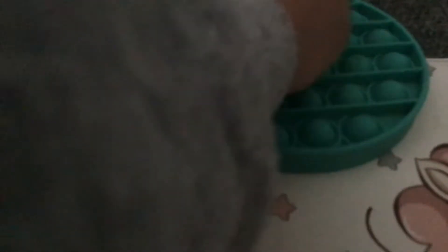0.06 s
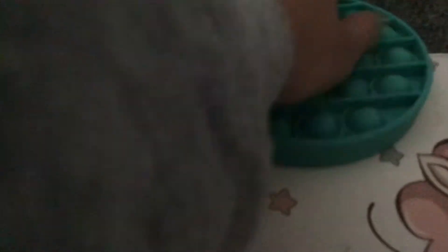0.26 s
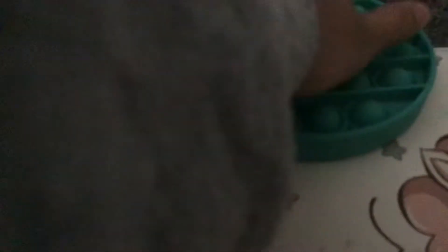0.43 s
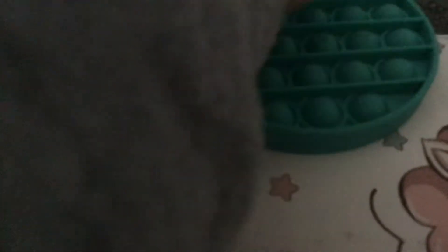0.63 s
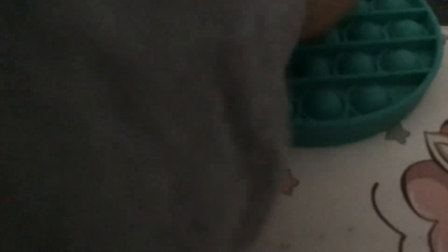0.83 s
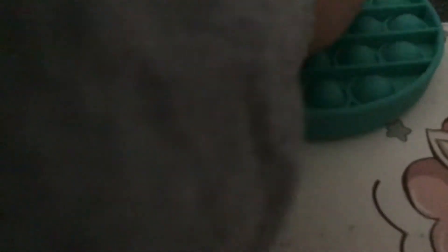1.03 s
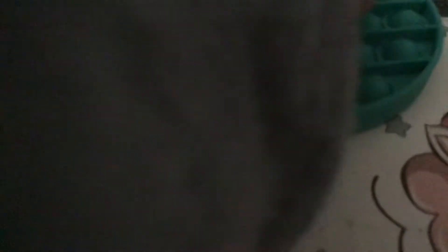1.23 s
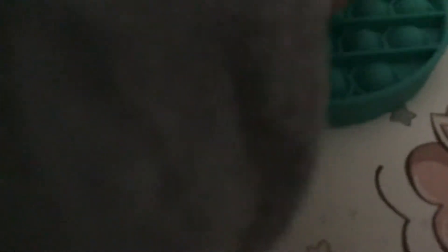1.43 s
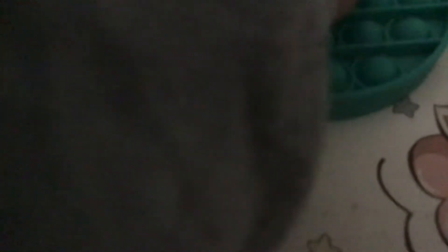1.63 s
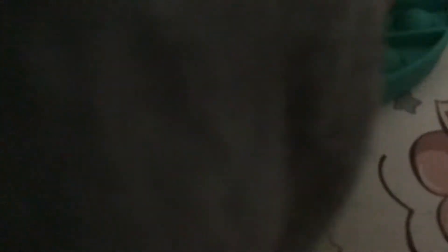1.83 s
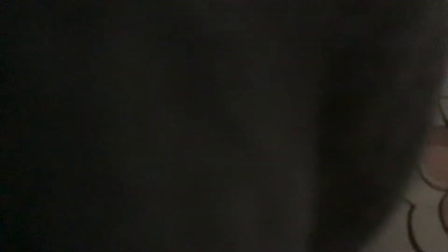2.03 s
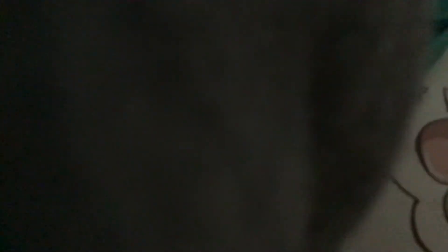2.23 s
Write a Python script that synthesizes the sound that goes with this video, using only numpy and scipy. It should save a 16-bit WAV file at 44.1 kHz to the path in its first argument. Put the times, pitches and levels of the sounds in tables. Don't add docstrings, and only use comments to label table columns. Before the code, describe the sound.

A finger presses silicone bubbles of a fidget toy, making uneven soft hollow pops and dull knocks

```python
import sys
import numpy as np
from scipy import signal
from scipy.io import wavfile

SR = 44100
rng = np.random.default_rng(int(sys.argv[2]) if len(sys.argv) > 2 else 0)


def invert_db(level):
    return 10 ** (np.asarray(level, dtype=float) / 20)


def put_to_file(sound):
    columns = np.atleast_2d(sound).T
    safe = np.clip(columns, -1, 1)
    whole_steps = np.round(safe * 32767)
    wavfile.write(sys.argv[1], SR, whole_steps.astype(np.int16))


N = 100107


def rms_one(x):
    return x / np.sqrt(np.mean(x ** 2) + 1e-20)


def bell(x, rise, fall):
    return np.exp(-(x / np.where(x < 0, rise, fall)) ** 2)


def drift(rate_hz):
    r = np.exp(-2 * np.pi * rate_hz * 40 / SR)
    settled = 2000
    slow = signal.lfilter([1], [1, -2 * r, r * r], rng.standard_normal(N // 40 + 2 + settled))[settled:]
    return np.interp(np.arange(N) / 40, np.arange(len(slow)), rms_one(slow))


def banded_noise(spectrum, patchy_db):
    out = 0
    together = drift(9)
    edges = 28 * 2 ** np.arange(0, 9.6, .5)
    white = rng.standard_normal((2, N))
    hz, db = np.transpose(spectrum)
    for k, (low, high) in enumerate(zip(edges, edges[1:])):
        band_pass = signal.butter(2, [low, high], "band", fs=SR, output="sos")
        band = signal.sosfilt(band_pass, white[k % 2])
        level_db = np.interp(np.log(low * high) / 2, np.log(hz), db)
        flicker_db = patchy_db * (.8 * together + .8 * drift(26))
        out = out + invert_db(level_db + flicker_db) * band
    return rms_one(out)


def packets(rows, sink, rise, fall, lag_s):
    wave = np.zeros(N)
    for crest_s, db, hz, cycles in rows:
        turns = (np.arange(N) / SR - crest_s - lag_s) * hz
        sinking_turns = (1 - np.exp(-sink * np.clip(turns, -8, 8))) / sink
        wave += invert_db(db) * bell(turns / cycles, rise, fall) * np.cos(2 * np.pi * sinking_turns)
    return wave


def ring(clicks, hz, t60_s):
    r = invert_db(-60 / (t60_s * SR))
    w = 2 * np.pi * hz / SR
    softener = signal.butter(1, [hz * .7, hz * 1.4], "band", fs=SR, output="sos")
    soft = signal.sosfilt(softener, clicks + 1e-18)
    return signal.lfilter([0, np.sin(w)], [1, -2 * r * np.cos(w), r * r], soft)


def quiet_room():
    # (frequency [Hz], density [dB per Hz])
    room_tone = [(18, -44), (30, -19.5), (114, -5.5), (324, -19.5), (505, -28.5), (1230, -35), (1910, -33),
                 (5170, -40.5), (15500, -52)]
    return invert_db(-65.5) * banded_noise(room_tone, patchy_db=1.2)


def sleeve_level():
    # (time [s], level [dB])
    brushing = [(0, -68), (.14, -74), (.31, -64), (.37, -53.5), (.55, -56), (.66, -54), (.8, -61),
                (.95, -68), (1.15, -72), (1.24, -61), (1.33, -62), (1.45, -68), (1.75, -70), (1.95, -66),
                (2.05, -61), (2.13, -69), (2.27, -71)]
    return np.interp(np.arange(N) / SR, *np.transpose(brushing))


def sleeve(sleeve_db):
    # (frequency [Hz], density [dB per Hz])
    wool = [(90, -30), (160, -2), (313, -3.5), (590, -10), (800, -18), (1200, -17), (1700, -28),
            (9000, -58)]
    return invert_db(sleeve_db) * banded_noise(wool, patchy_db=2.5)


def restless_mat(sleeve_db):
    mat_hz, width_hz = 97, 50
    shoves = rng.standard_normal(N) * invert_db(2.6 * drift(3.6))
    resonance = signal.lfilter(*signal.iirpeak(mat_hz, mat_hz / width_hz, fs=SR), shoves)
    low_band = signal.butter(2, [45, 200], "band", fs=SR, output="sos")
    rumble = rms_one(signal.sosfilt(low_band, resonance))
    follow_db = .3 * (sleeve_db - sleeve_db.mean())
    return invert_db(-59 + follow_db) * rumble


def skin():
    # (time of the crest [s], level [dB], rise [s], fall [s])
    slides = [(.045, -69, .04, .05), (.235, -57.5, .04, .06), (.38, -72, .03, .03), (.6, -66, .03, .05),
              (.745, -66, .02, .06), (.88, -59.5, .045, .04), (1.04, -76, .02, .02),
              (1.27, -58, .015, .015), (1.3, -58.5, .05, .04), (1.59, -74, .03, .03), (1.71, -74, .03, .03),
              (1.955, -72, .02, .03), (2.045, -68, .02, .015), (2.09, -67, .03, .04)]
    # (frequency [Hz], density [dB per Hz])
    friction = [(290, -27), (500, 1), (638, 3), (839, -8), (1240, -6), (1800, -11), (4840, -20.5),
                (15500, -35)]
    pressure = np.zeros(N)
    for crest_s, db, rise_s, fall_s in slides:
        pressure += invert_db(db) * bell(np.arange(N) / SR - crest_s, rise_s, fall_s)
    return pressure * banded_noise(friction, patchy_db=1.5)


def wobbles():
    # (time of the crest [s], peak level [dB], frequency [Hz], length [cycles])
    pushes = [(.085, -45.5, 128, 0.76), (.211, -41.5, 151, 0.91), (.2345, -22, 99, 0.96),
              (.2585, -28.5, 111, 2.26), (.33, -47, 68.5, 1.65), (.602, -33.5, 100, .4),
              (.6112, -32, 100, .7), (.651, -41, 80, 1.1), (.679, -41.5, 111, 1.35), (.7745, -29, 105, 1.4),
              (.864, -30, 114, 1.1), (.883, -27.5, 73, 1.57), (.95, -48.5, 71, 1.3),
              (1.03, -45.5, 114, 1.3), (1.056, -47, 102, 1.14), (1.2982, -27, 85, .7),
              (1.3105, -39, 100, .4), (1.318, -27, 98, .9), (1.362, -33.5, 111, 1.56),
              (1.393, -32, 117, 0.52), (1.416, -30.5, 82.7, 0.66), (1.548, -44, 132, 0.62),
              (1.5755, -33.5, 108, 0.69), (1.633, -41.5, 101, 0.57), (1.658, -44.5, 108, 2),
              (1.7105, -32, 76.3, 0.82), (1.9695, -35.5, 97, 1.26), (2.064, -35, 90, .5),
              (2.0765, -29, 100, .5), (2.088, -27.5, 97, .8), (2.145, -38.5, 100, 1.2),
              (2.2295, -35, 101, 0.8), (1.04, -50, 55, 1.2), (1.39, -42, 58, .9), (1.505, -54, 60, 1.2),
              (1.775, -54, 110, 1.5), (1.69, -42, 125, .8), (2.2, -48, 45, 1.3)]
    return packets(pushes, sink=.07, rise=.95, fall=1.15, lag_s=.0013)


def snaps():
    # (time [s], peak level [dB], hollow modes [dB], wall modes [dB], rim modes [dB])
    dome_snaps = [(.2029, -61, 2, -6, -8), (.2262, -42, 4, -2, -12), (.2351, -45, 0, -16, -18),
                  (.3554, -60, 9, -6, -6), (.5764, -52, 8, -14, -14), (.6008, -37, -14, -3, 1),
                  (.7362, -30, -12, -1, -17), (.7472, -54, -6, -2, -6), (.9894, -66, -8, 4, 1),
                  (1.043, -68, -10, 8, 2), (1.2708, -42, 0, 3, 1), (1.2762, -54, 0, 4, 4),
                  (1.2793, -38, -10, 0, -1), (1.2842, -52, 2, -4, -6), (1.3072, -54, 6, -8, -8),
                  (1.3432, -43, -12, 3, 1), (1.5841, -53, 10, -10, -12), (1.6924, -52, 9, -12, -12),
                  (1.7185, -63, -6, 5, 0), (1.953, -62, -1, -2, -5), (2.0495, -58, 2, -8, -10),
                  (2.0535, -62, -4, 0, -4), (2.064, -36.5, -14, -12, -6), (2.1994, -64, 9, -8, -8),
                  (2.2637, -43, 5, -4, -4)]
    # (frequency [Hz], level [dB], decay time t60 [s], polarity [+1 or -1])
    dome_modes = [(620, -1, .012, 1), (950, 2, .008, -1), (1290, 1, .011, 1), (1560, -1, .008, -1),
                  (2070, -8, .008, -1), (2480, -16, .006, 1), (3300, -9, .007, 1), (3420, -30, .06, 1),
                  (4200, -5, .006, -1), (4850, -13, .006, 1), (5620, -23, .007, 1), (6200, -13, .008, -1),
                  (7250, -20, .006, 1)]
    buckle_db = [-12, 2.5, -9]
    buckle_gap_s = .0005
    hollow_to_hz, wall_from_hz, rim_from_hz, top_from_hz = 1100, 2300, 3800, 5900
    s, db, hollow_db, wall_db, rim_db = np.transpose(dome_snaps)
    chance = rng.standard_normal((len(s), 3, len(dome_modes) + 1))
    buckle_s = buckle_gap_s * (np.arange(3) - .2) * (1 + .15 * chance[..., -1])
    at = ((s[:, None] + buckle_s) * SR).astype(int)
    out = np.zeros(N)
    for k, (hz, level_db, t60_s, polarity) in enumerate(dome_modes):
        own_db = db + level_db - 2.5
        if hz < hollow_to_hz:
            own_db = own_db + hollow_db
        if hz > rim_from_hz:
            own_db = own_db + rim_db
        elif hz > wall_from_hz:
            own_db = own_db + wall_db
        if hz > top_from_hz:
            own_db = own_db + 3.2 * (db + 34)
        clicks = np.zeros(N)
        clicks[at] = polarity * invert_db(own_db[:, None] + np.array(buckle_db) + 1.1 * chance[..., k])
        out += ring(clicks, hz, t60_s)
    return out


def reflections(tick):
    t = np.arange(SR // 5) / SR
    tail = rng.standard_normal(len(t)) * invert_db(-60 * t / .07)
    tail = tail * (t > .003)
    return invert_db(-40) * signal.fftconvolve(tick, tail)[:N]


def knocks():
    # (time of the crest [s], peak level [dB], frequency [Hz], length [cycles])
    knocks_and_thuds = [(.225, -33, 230, 0.7), (.2455, -47, 330, .8), (.7378, -33, 330, .6),
                        (.5773, -40, 600, 1.4), (.5825, -32, 150, .7), (.5915, -31, 105, .7),
                        (.7408, -26, 322, .95), (.751, -26.5, 203, 1.0), (.857, -38, 227, 0.87),
                        (1.2732, -27.5, 300, .8), (1.2729, -33.5, 540, .9), (1.3085, -43, 420, 1.5),
                        (1.5862, -29.5, 290, 0.6), (1.6945, -34, 268, 0.71), (2.0657, -38.5, 650, 1.9),
                        (2.0495, -48, 240, .8), (2.05, -48, 320, 1.54), (2.2665, -33, 303, 0.84),
                        (2.201, -59, 600, 0.91), (1.2895, -29.5, 190, .8), (1.355, -40, 200, 1.0),
                        (1.5897, -34, 190, .8), (1.2765, -28.5, 130, .8), (1.7005, -39, 170, .7),
                        (1.9615, -44, 180, .8), (2.217, -44, 210, 1.0), (.679, -44, 220, 1.0),
                        (.636, -44, 250, 1.0), (.425, -45, 180, 2.2), (.468, -46, 290, 2.2),
                        (.515, -45, 240, 3), (.615, -44, 220, 1.5), (.9, -43, 200, 2.2), (1.325, -41, 200, 1.5),
                        (2.105, -46, 310, 2.2), (2.135, -46, 220, 2.2), (1.26, -53, 420, 3)]
    return packets(knocks_and_thuds, sink=.23, rise=.37, fall=1.16, lag_s=.0002)


def air_puffs():
    # (time [s], level [dB])
    puffs = [
        (.7368, -47),
        (.9902, -70),
        (1.2714, -36.5),
        (2.2643, -50),
    ]
    s, db = np.transpose(puffs)
    air = np.zeros(N)
    air[(s * SR).astype(int)] = invert_db(db)
    bright = signal.butter(2, 8500, "high", fs=SR, output="sos")
    return signal.sosfilt(bright, signal.sosfilt(bright, air + 1e-18))


def scene():
    sleeve_db = sleeve_level()
    background = quiet_room() + sleeve(sleeve_db) + restless_mat(sleeve_db)
    tick = snaps() + air_puffs()
    toy = tick + reflections(tick) + knocks()
    return (background + skin() + wobbles() + toy)[None]


def top_cut(x):
    return signal.sosfilt(signal.butter(12, 15940, fs=SR, output="sos"), x)


def record(dry):
    bass_cut = signal.butter(2, 33, "high", fs=SR, output="sos")
    mix = signal.sosfilt(bass_cut, signal.sosfilt(bass_cut, dry))
    return top_cut(mix)


dry = scene()
out = record(dry)
put_to_file(out)
```